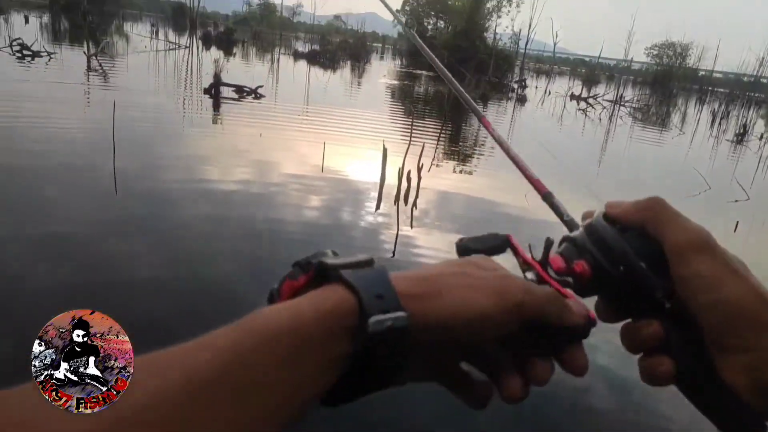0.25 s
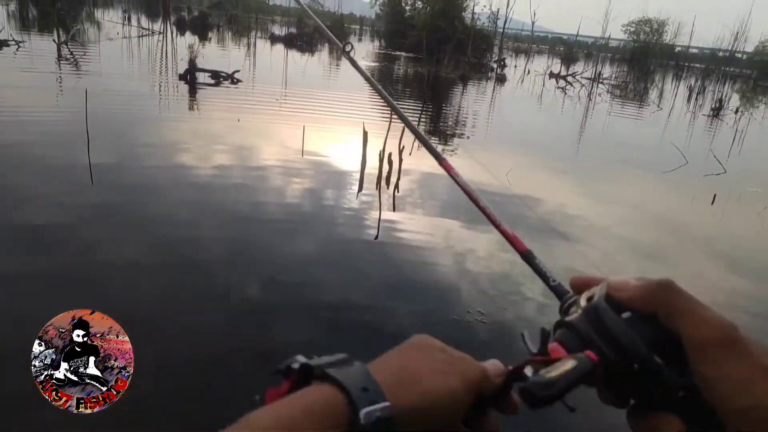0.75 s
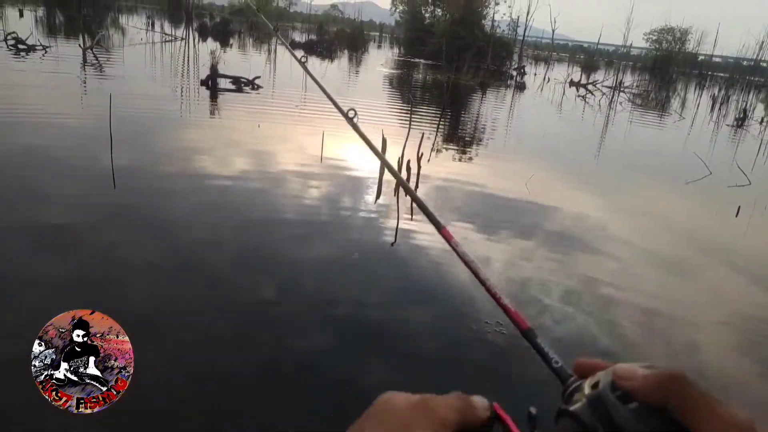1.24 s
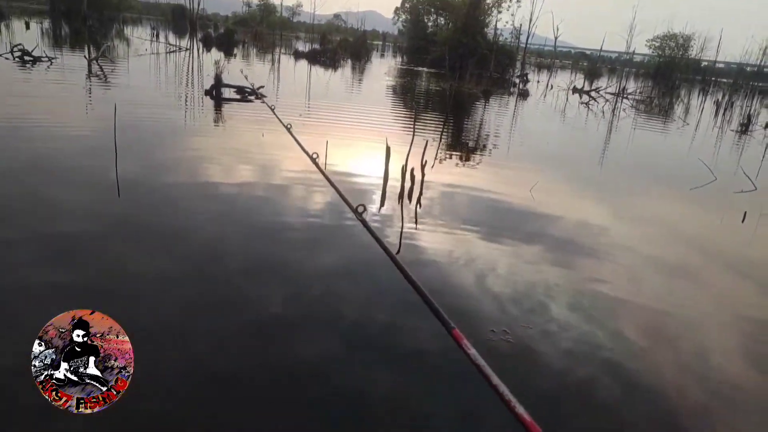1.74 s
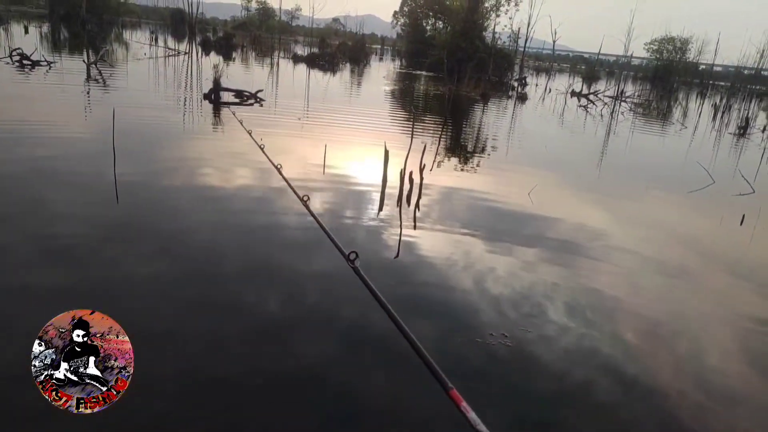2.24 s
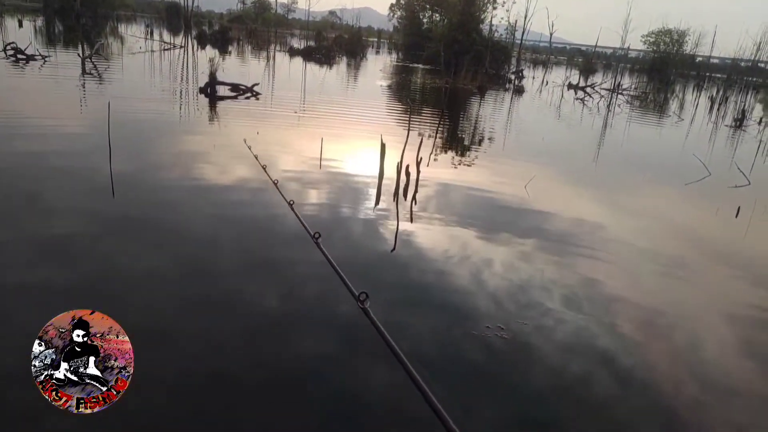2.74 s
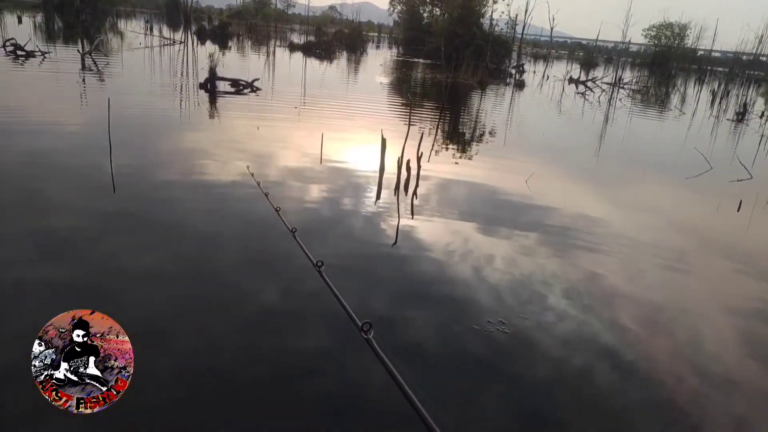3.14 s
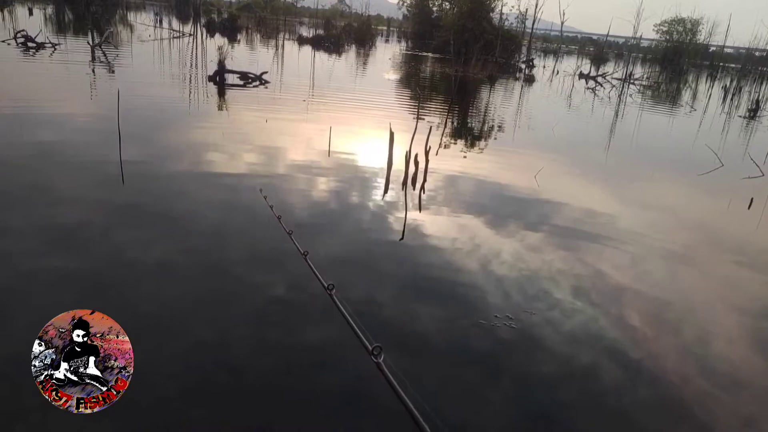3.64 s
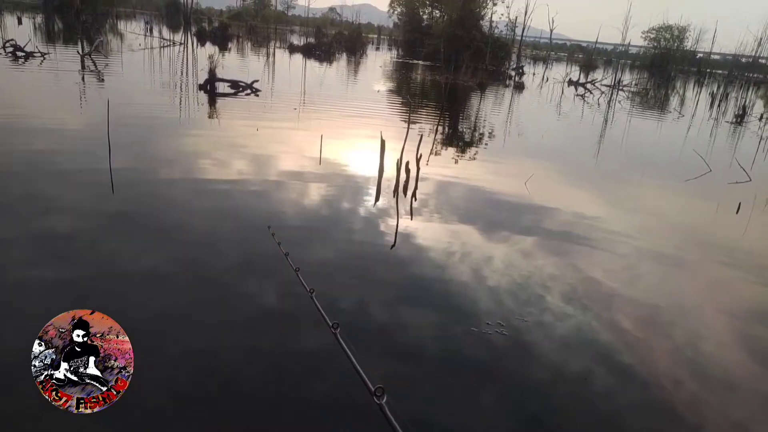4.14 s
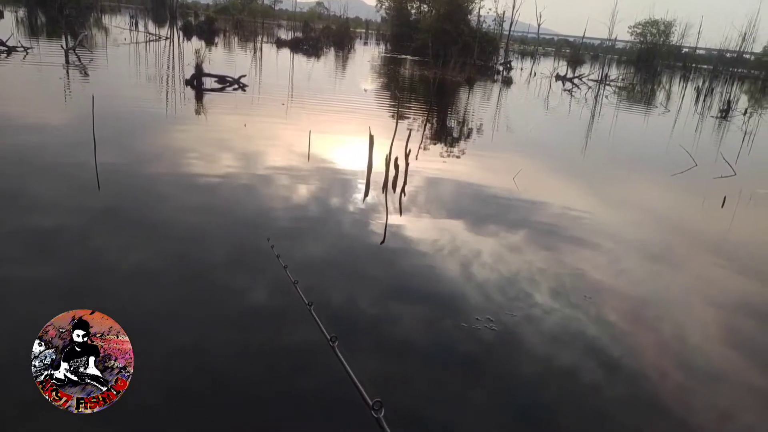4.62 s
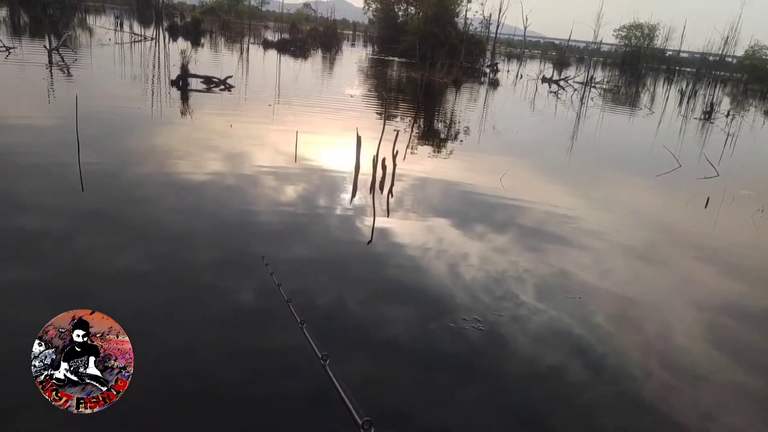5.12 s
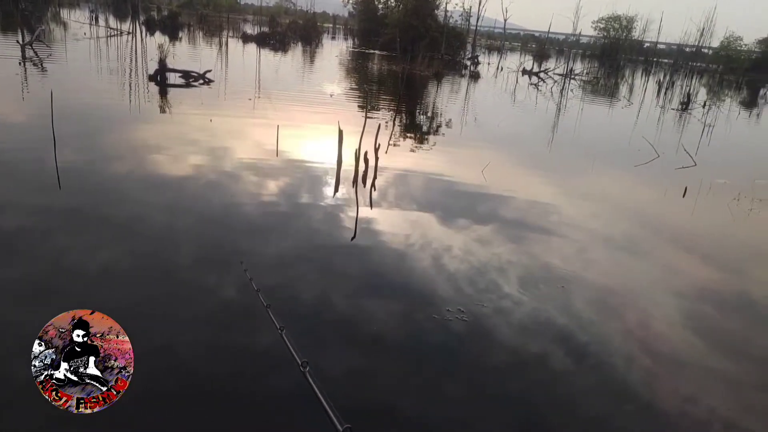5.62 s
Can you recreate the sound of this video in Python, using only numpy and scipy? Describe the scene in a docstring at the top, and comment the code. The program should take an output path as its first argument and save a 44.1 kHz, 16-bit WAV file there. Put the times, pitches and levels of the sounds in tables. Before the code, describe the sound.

A slow fishing reel whirrs and ticks close by while a small bird gives whistle-and-chirp calls over low distant traffic rumble on a swamp.

```python
"""Winding in a lure on a swamp

An angler winds slowly: gear teeth whirr as noise bursts plus harmonics, ringing ticks and noise scuffs sit
close by, and sine glides squeak. A small bird whistles, then chirps upward, and a far bird wails faintly:
gliding sines smeared by reeds. Insects trill and pip in narrow noise bands, a broad soft band joins them;
plops are short, broad resonances. Distant traffic is low noise with drones, the breeze lumpy noise and puffs
on the microphone, the hiss shimmering high noise."""
import sys
import numpy as np
from scipy import signal
from scipy.fft import rfft, irfft, next_fast_len
from scipy.io import wavfile

SR = 44100
rng = np.random.default_rng(int(sys.argv[2]) if len(sys.argv) > 2 else 0)


def pcm_store(signal):
    """Save signal as 16-bit PCM."""
    levels = np.round(np.clip(np.atleast_2d(signal), -1, 1) * 32767)
    wavfile.write(sys.argv[1], SR, levels.astype(np.int16).T)


N = 258867
T = np.arange(N) / SR
CUTOFF_HZ = 14300
LEFT_LEAD_S, BIRD_LEAD_S = .00009, .00006


def from_db(db):
    """Decibels to gain."""
    return 10 ** (np.asarray(db) / 20)


def rms_one(x):
    """Scale to unit rms."""
    return x / np.sqrt(np.mean(x ** 2) + 1e-20)


def pan(db):
    """Left and right gains for a left-right level difference."""
    return from_db(np.array([[db], [-db]]) / 2)


def drift(rate):
    """Slow chance of rms 1: 2 * rate random steps per second, joined by straight lines."""
    steps = rng.standard_normal(N // 8)
    return rms_one(np.interp(2 * rate * T, np.arange(len(steps)), steps))


def hump(s, half_s):
    """Smooth rise to 1 at time s and back; 1/e at half_s to either side."""
    return np.exp(-((T - s) / half_s) ** 2)


def swell(s, rise_s, decay_s):
    """Exponential growth to 1 at time s, then exponential decay."""
    exponent = np.minimum((T - s) / rise_s, (s - T) / decay_s)
    return np.exp(np.maximum(exponent, -30))


def white(likeness):
    """Stereo white noise; likeness is the correlation of its channels."""
    c = np.clip(likeness, -1, 1)
    mid, side = rng.standard_normal((2, N))
    return np.sqrt(1 + c) * mid + np.sqrt(1 - c) * np.array([side, -side])


def colour(x, spectrum):
    """Filter by (frequency [Hz], level [dB]) or (frequency [Hz], left [dB], right [dB]); rms 1."""
    size = next_fast_len(N)
    log_hz = np.log(np.fft.rfftfreq(size, 1 / SR) + 1)
    hz, *columns = np.transpose(spectrum)
    log_points = np.log([hz[0] / 2, *hz, hz[-1] * 2])
    gains = from_db([np.interp(log_hz, log_points, [-90, *c, -90]) for c in columns])
    return rms_one(irfft(rfft(x, size) * gains, size)[:, :N])


def resonate(x, hz, width_hz):
    """Resonance applied twice for steep skirts; width_hz is that of one pass."""
    centre = min(hz, .45 * SR)
    b, a = signal.iirpeak(centre, centre / width_hz, fs=SR)
    once = signal.lfilter(b, a, x)
    return signal.lfilter(b, a, once)


def add(out, s, sound):
    """Mix a short sound in at time s."""
    i = max(int(s * SR), 0)
    out[..., i:i + sound.shape[-1]] += sound[..., :max(N - i, 0)]


def left_first(x, lead_s=LEFT_LEAD_S):
    """Sound reaches the right port a little later than the left."""
    return np.array([x[0], np.interp(T - lead_s, T, x[-1])])


OPENING_S = .045   # part of a note, before stretching, that may be firm or soft


def notes(shape, sung, waver, flutter_db):
    """Near-pure tone: one pitch and level gesture, stretched, opened firm or soft, never quite steady."""
    s, hz, db = np.transpose(shape)
    out = np.zeros(N)
    for start, level_db, ratio, stretch, opening_db in sung:
        t = T[:int(s[-1] * stretch * SR)] / stretch
        pitch_hz = ratio * np.interp(t, s, hz) * (1 + waver * drift(173)[:len(t)])
        opening = np.interp(t, [OPENING_S / 2, OPENING_S], [opening_db, 0])
        flutter = flutter_db * drift(108.6)[:len(t)]
        loudness = from_db(level_db + np.interp(t, s, db) + opening + flutter)
        add(out, start, loudness * np.sin(2 * np.pi * np.cumsum(pitch_hz) / SR))
    return out


REEDS_T60_S = .48


def reeds(x, near_db, near_s, far_db):
    """Nearby stems smear a call at once; the banks add a faint tail, another for each ear."""
    t = T[:int(.6 * SR)]
    near, far = np.exp(-t / near_s), from_db(-60 * t / REEDS_T60_S)
    envelope = from_db(near_db) * rms_one(near) + from_db(far_db) * rms_one(far)
    echoes = envelope / np.sqrt(len(t)) * rng.standard_normal((2, len(t)))
    return left_first([x], BIRD_LEAD_S) + signal.fftconvolve(x[None], echoes, axes=1)[:, :N]


TAUT_AT_S, TIGHTEN_S, SLACK_LOAD = 2.1, 0.57, 0.12


def load():
    """Pull of the line on the reel, 0-1: grows from its slack share as the line comes taut."""
    return SLACK_LOAD + (1 - SLACK_LOAD) / (1 + np.exp((TAUT_AT_S - T) / TIGHTEN_S))


# pushes on the crank: (time [s], rise [dB], half length [s])
CRANK_PUSHES = [(1.57, 9, 0.0399), (2.162, 6, 0.0351), (2.51, 7, 0.04015), (2.661, 4, 0.039),
                (2.971, 8, 0.0397), (3.139, 4, 0.039), (3.442, 4, 0.0703), (3.592, 7, 0.0351),
                (3.847, 8, .02), (4.041, 7, .03), (4.298, 4, 0.0502), (4.44, 4, 0.0599), (4.829, 5, 0.0795),
                (5.019, 4, 0.0499), (5.22, 6, 0.0303), (5.342, 5, 0.0402), (5.459, 4, 0.0504),
                (5.818, 4, 0.0506)]
# resonance of the reel's body: (frequency [Hz], level [dB per Hz])
REEL_BODY_SPECTRUM = [(1000, -19), (1450, -11), (1750, -0.5), (2050, 1), (2300, -10.5), (2700, -12),
                      (3400, -62)]
GEARS_FULL_LOAD_DB, TEETH_PER_S = -59, 170   # level between pushes
WHINE_TO_FRICTION_DB, WHINE_FLICKER_DB = 3, 5
GEAR_BEND_PER_DB = 0.01   # share of pitch


def gears(mesh_db, uneven, effort_db):
    """Meshing teeth: friction bursts and a wavering whine in the reel's body; a push is louder, higher."""
    push_db = sum(db * hump(s, half_s) for s, db, half_s in CRANK_PUSHES) + effort_db * drift(9)
    mesh = 2 * np.pi * np.cumsum(TEETH_PER_S * (1 + uneven * drift(11))) / SR
    friction = rms_one(white(0.87) * from_db(mesh_db * np.cos(mesh)))
    whine = 0
    for harmonic in range(9, 15):
        partial = np.cos(harmonic * mesh + rng.uniform(0, 2 * np.pi))
        whine = whine + partial * from_db(WHINE_FLICKER_DB * drift(14))
    body_whine = from_db(WHINE_TO_FRICTION_DB) * colour(whine, REEL_BODY_SPECTRUM)
    whirr = rms_one(colour(friction, REEL_BODY_SPECTRUM) + body_whine)
    # bent playback time raises the pitch with the push
    bent_s = T + GEAR_BEND_PER_DB * np.cumsum(push_db - push_db.mean()) / SR
    whirr = np.array([np.interp(bent_s % T[-1], T, side) for side in whirr])
    return from_db(GEARS_FULL_LOAD_DB + push_db) * load() * left_first(whirr)


# dull road noise: (frequency [Hz], level [dB per Hz])
ROAD_SPECTRUM = [(25, 4), (60, 1), (100, -0.5), (200, -4), (320, -7.5), (500, -12.5), (700, -20.5),
                 (1000, -36.5), (1400, -54), (2500, -38)]
# engine drones: (frequency [Hz], width [Hz], level [dB], nearest at [s])
ENGINE_DRONES = [(85.05, 11.9, -48.5, 0.92), (150.65, 8.8, -55.5, 5.65), (293.8, 26, -55.5, 3.16),
                 (359.1, 10.3, -62, 3.7), (459.6, 27, -62.5, .3)]
PASS_DB, PASS_HALF_S = 3.5, 0.87
ROAD_DB, SWELL_DB, SWELL_AT_S, SWELL_HALF_S = -40.5, 1, 4.5, 0.95   # road level outside the swell


def traffic():
    """Dull road noise and resonant engine notes, each swelling as its vehicle passes; one broad swell."""
    road = from_db(ROAD_DB) * colour(white(0.87), ROAD_SPECTRUM)
    source = white(0.9)
    engines = 0
    for hz, width_hz, db, s in ENGINE_DRONES:
        level = from_db(db + PASS_DB * hump(s, PASS_HALF_S))
        engines = engines + level * rms_one(resonate(source, hz, width_hz))
    return left_first(road + engines) * from_db(SWELL_DB * hump(SWELL_AT_S, SWELL_HALF_S))


# wind noise: (frequency [Hz], level [dB per Hz])
BREEZE_SPECTRUM = [(8, 3.5), (25, -12), (47, -0.5), (70, -14), (120, -31), (300, -30.5), (900, -41.5)]
# gusts: (time [s], rise [dB], half length [s])
BREEZE_GUSTS = [(.2, 8, 0.32), (2.557, 6, 0.075), (3.628, 3, 0.088), (5.65, 4.5, 0.38)]
# puffs on the microphone: (time [s], peak level [dB], swing [Hz], left-right [dB])
AIR_PUFFS = [(0.32, -27, 51.3, -22.5), (.365, -33, 37.7, -26), (0.43, -38, 53.5, -28)]
BREEZE_DB, WAVER_DB, WAVER_RATE = -45, 1, 1.72   # level between gusts


def breeze():
    """Lumpy low noise, partly each port's own; a puff pushes and pulls the diaphragm once."""
    air = white(.45)
    gusts_db = sum(db * hump(s, half_s) for s, db, half_s in BREEZE_GUSTS)
    level = from_db(BREEZE_DB + gusts_db + WAVER_DB * drift(WAVER_RATE))
    out = level * colour(air, BREEZE_SPECTRUM) * pan(-0.38)
    for s, peak_db, hz, side_db in AIR_PUFFS:
        turn = 2 * np.pi * hz * (T - s)
        push_pull = turn * np.exp((1 - np.minimum(turn ** 2, 100)) / 2)   # peaks at 1
        out = out - from_db(peak_db) * pan(side_db) * push_pull
    return out


def shimmer(x, patchy_db, per_s, count=24):
    """Above 1 kHz each narrow band flickers on its own."""
    size = next_fast_len(N)
    spectrum = rfft(x, size)
    edges = np.geomspace(1000, CUTOFF_HZ, count)
    band_of_bin = np.digitize(np.fft.rfftfreq(size, 1 / SR), edges[:-1])
    out = 0
    for k in range(count):
        band = irfft(spectrum * (band_of_bin == k), size)[:, :N]
        flicker = from_db(patchy_db * drift(per_s)) if k else 1   # band 0 is below 1 kHz
        out = out + band * flicker
    return rms_one(out)


# hiss of air and microphone: (frequency [Hz], left [dB per Hz], right [dB per Hz])
HISS_SPECTRUM = [(574, 14, 14), (1305, 1.5, 0), (2500, 0.5, 3), (3500, 0.5, -1), (4200, -1, -0.5),
                 (6000, -1, 2.5), (8450, -0.5, -1.5), (9350, 0.5, -7), (11700, 0, -9), (14200, -1.5, -9.5)]
HISS_START_DB, HISS_DB, HISS_RISE_S = -56, -52, 1.2


def hiss(flicker_db):
    """Shimmering bed of high noise, brighter on the left; quieter at first."""
    db = np.interp(T, [0, HISS_RISE_S], [HISS_START_DB, HISS_DB])
    bed = shimmer(colour(white(0), HISS_SPECTRUM), patchy_db=2.0, per_s=18)
    return from_db(db + flicker_db * drift(16)) * bed


PULSE_WAVER, BANDS_TRIM_DB = .06, -2.5   # share of pulse rate


def noise_bands(rows, throb_db, swell_db, fade_s):
    """Resonant noise bands, each throbbing, swelling and fading by chance; a row may pulse."""
    out, source = 0, white(0.042)
    for start, end, hz, width_hz, db, side_db, per_s, depth_db in rows:
        present = np.clip(np.minimum(T - start, end - T) / fade_s + 1, 0, 1)
        pulse = 2 * np.pi * per_s * np.cumsum(1 + PULSE_WAVER * drift(3.8)) / SR
        motion_db = depth_db * np.cos(pulse) + throb_db * drift(31) + swell_db * drift(2.8)
        band = rms_one(resonate(source, hz, width_hz))
        out = out + present * from_db(db + motion_db) * pan(side_db) * band
    return from_db(BANDS_TRIM_DB) * out


# noise bands, insects and last a broad soft one: (from [s], to [s], pitch [Hz], width [Hz],
#     level before trim [dB], left-right [dB], pulse rate [1/s], pulse depth [dB])
BAND_ROWS = [(1.4, 5.87, 4510, 90, -69.5, -3, 0, 0), (2.5, 5.87, 5250, 120, -70.5, -4, 0, 0),
             (1.1, 5.87, 6970, 400, -64.5, -4, 0, 0), (0, 5.87, 8168, 70, -67, 4.5, 16.6, 3.2),
             (2.3, 5.87, 9480, 450, -69.5, 12, 0, 0), (.6, 2.6, 9950, 1000, -66.5, 16, 0, 0),
             (1.5, 2.3, 7000, 260, -68.5, 6, 0, 0), (.6, 2.2, 2650, 800, -63, 1, 0, 0)]
*INSECT_TRILLS, SOFT_BAND = BAND_ROWS


def insects(**motion):
    """Each kind shrills in a noise band of its own; one pulses with its wing strokes."""
    return noise_bands(INSECT_TRILLS, **motion)


# hand and line on the reel: (peak time [s], level [dB], rise [s], decay [s], left-right [dB])
REEL_SCUFFS = [(.06, -49, 0.096, 0.087, 3.5), (0.431, -52.5, 0.027, 0.22, 0.5),
               (0.552, -38.5, 0.0018, 0.0064, -9), (1.165, -41.5, 0.0025, 0.011, -13.5),
               (1.368, -48, 0.0048, 0.043, -4.5), (2.74, -59, 0.11, 0.11, 0), (3.1, -62, 0.14, 0.087, -9),
               (3.6, -59.5, 0.054, 0.033, -16), (4.59, -57, 0.012, 0.083, -13)]
# scuffing friction: (frequency [Hz], left [dB per Hz], right [dB per Hz])
SCUFF_SPECTRUM = [(990, -6, -17), (3500, -4, -17), (4680, -10, -6), (6000, -7, 1.5), (7850, -15, -2.5),
                  (9400, -3, -10.5), (14300, -4.5, -22)]


def scuffs(grain_db):
    """Hand and line scuff the reel: short swells of grainy friction noise."""
    friction = colour(white(0.063) * from_db(grain_db * drift(900)), SCUFF_SPECTRUM)
    envelope = 0
    for s, db, rise_s, decay_s, side_db in REEL_SCUFFS:
        envelope = envelope + from_db(db) * pan(side_db) * swell(s, rise_s, decay_s)
    return friction * envelope


FAINT_TICKS_PER_S, FAINT_TICK_DB, FAINT_TICK_SIDE_DB = 1.9, -47, 4   # rate at full load
FAINT_TICK_HZ, FAINT_TICK_OCTAVES = 3820, (-1.48, 1.184)
FAINT_TICK_WIDTH, FAINT_TICK_RATTLE = 0.53, 0.061   # share of pitch; 0-1


def faint_ticks():
    """Chance contacts, more frequent under load, as rows like those of REEL_TICKS."""
    times = T[rng.random(N) < FAINT_TICKS_PER_S * load() / SR]
    pitches_hz = FAINT_TICK_HZ * 2 ** rng.uniform(*FAINT_TICK_OCTAVES, len(times))
    return [(s, FAINT_TICK_DB, hz, FAINT_TICK_WIDTH * hz, FAINT_TICK_RATTLE, FAINT_TICK_SIDE_DB)
            for s, hz in zip(times, pitches_hz)]


# clearest ticks and knocks of the reel: (time [s], peak before pan [dB], ring [Hz], width [Hz],
#                                         rattle [0-1], left-right [dB])
REEL_TICKS = [(0.071, -37, 5100, 3000, 0.12, 2), (1.085, -39.5, 3120, 1590, 0.08, 4),
              (1.37, -38, 11000, 6000, 0, 9), (1.4605, -36, 3080, 2000, 0.04, 0),
              (1.522, -38.5, 3000, 2370, 0.1, 2), (1.96, -42, 3200, 1500, 0.1, 0),
              (2.321, -39.5, 2750, 1100, 0.03, 0), (2.742, -40, 11900, 6500, .08, 13),
              (2.872, -42, 3200, 3600, .05, 0), (2.9095, -36.5, 3500, 2300, 0.08, 2),
              (3.008, -40, 12000, 6500, 0.1, 15), (3.02, -40, 12000, 6500, .08, 14),
              (3.117, -48, 2940, 700, 0.08, -1), (3.3763, -42, 3200, 2800, 0.02, 2),
              (3.849, -39.5, 3220, 3000, 0.08, 2), (3.9637, -35.5, 3040, 700, 0.05, -1),
              (4.4978, -44, 2500, 1100, 0.07, 0), (4.271, -40, 9040, 5000, .08, 10),
              (4.7344, -29, 3500, 2500, 0.07, 2), (4.996, -28, 7200, 7000, 0.05, 2),
              (5.42, -36, 3000, 1600, 0.12, 0), (5.426, -36, 5500, 4500, 0.17, 0),
              (5.728, -39, 4100, 1300, 0.05, 0), (5.8319, -30, 3150, 800, 0.015, 1),
              (3.9646, -45, 1050, 600, .03, 3), (4.203, -41, 845, 600, 0.04, 1),
              (4.812, -40, 1090, 700, 0.08, 2), (5.506, -40.5, 1500, 800, 0.09, 7),
              (5.706, -38, 1430, 600, 0.1, 5)]


def ticks(rattle_s):
    """Each contact is a snap and a brief noise rattle into a damped part of the reel."""
    out, t = np.zeros((2, N)), T[:1024]
    for s, peak_db, hz, width_hz, rattle, side_db in REEL_TICKS + faint_ticks():
        force = rattle * rng.standard_normal((2, len(t))) * np.exp(-t / rattle_s)
        force[:, 0] += 1   # snap
        tick = resonate(force, hz, min(width_hz, SR / 4))
        add(out, s, tick / np.abs(tick).max() * from_db(peak_db) * pan(side_db))
    return out


# arched wail: (time after start [s], pitch [Hz], relative level [dB])
WAIL_SHAPE = [(0, 842, -4.5), (.025, 910, -2), (.04, 963, -8.5), (.055, 1160, -21), (.11, 1120, -14),
              (.17, 1070, -16), (.22, 890, -5.5), (.255, 880, -43)]
# wails sung: (time [s], level before trim and reeds [dB], pitch ratio, length ratio, opening [dB])
WAILS_SUNG = [(.225, -62, 1, 0.95, -2), (1.184, -60.5, 1.0, 0.98, 1), (2.438, -57.5, 1.005, 1, -4)]
WAIL_TRIM_DB = -2.0


def far_bird():
    """Faint gliding wail from across the water on the left."""
    wail = notes(WAIL_SHAPE, WAILS_SUNG, waver=.005, flutter_db=2.5)
    return from_db(WAIL_TRIM_DB) * reeds(wail, near_db=6.0, near_s=0.015, far_db=-11) * pan(13.6)


# arched whistle: (time after start [s], pitch [Hz], relative level [dB])
WHISTLE_SHAPE = [(0, 4600, -18), (.015, 4900, -5), (.03, 5200, -3), (.045, 5370, -1), (.06, 5420, -1),
                 (.078, 5390, -2), (.092, 5280, -10), (.105, 5150, -28)]
# whistles sung: (time [s], level before reeds [dB], pitch ratio, length ratio, opening [dB])
WHISTLES_SUNG = [(.383, -52, 1.0, 1.05, -9), (1.217, -47, 1.003, 1.0, 1), (2.165, -50, 1.003, 1.0, 2),
                 (3.558, -48, .985, .9, -1), (4.586, -54.5, 1.03, 1.5, 7), (5.643, -48.5, .975, .95, -11)]
# rising chirp: (time after start [s], pitch [Hz], relative level [dB])
CHIRP_SHAPE = [(0, 2950, -22), (.014, 3170, -19), (.04, 3550, -27), (.052, 3720, -15), (.065, 3900, -8),
               (.08, 4130, -6), (.092, 4380, -3), (.102, 4600, 0), (.109, 4830, 1), (.115, 5250, 1),
               (.121, 5500, -4), (.127, 5650, -26)]
# chirps sung: (time [s], level before reeds [dB], pitch ratio, length ratio, opening [dB])
CHIRPS_SUNG = [(.521, -43, 1.015, 1.0, -9), (1.357, -45, 1.0, 1.0, -2), (2.308, -45, 1.005, .985, 0),
               (3.692, -45, .995, 1.02, 1), (4.741, -44.5, .995, 1.0, 1), (5.782, -44, 1.0, 1.02, -5)]


def bird():
    """Two-note call from the reeds: gliding tones, an arched whistle then a rising chirp."""
    whistles = notes(WHISTLE_SHAPE, WHISTLES_SUNG, waver=.007, flutter_db=2.5)
    chirps = notes(CHIRP_SHAPE, CHIRPS_SUNG, waver=.009, flutter_db=2.8)
    return reeds(whistles + chirps, near_db=-8.5, near_s=.03, far_db=-6) * pan(-3)


def soft_band(**motion):
    """Broad soft noise band near 2.7 kHz (last of BAND_ROWS)."""
    return noise_bands([SOFT_BAND], **motion)


def bursts(rows, rise_s):
    """Short bursts of broadly resonant noise that die away."""
    out = np.zeros((2, N))
    for s, db, hz, decay_s, side_db in rows:
        burst = rms_one(resonate(white(0.17), hz, hz))
        out += from_db(db) * pan(side_db) * swell(s, rise_s, decay_s) * burst
    return out


# short bursts, plops in the water and last a dull scuff of the reel:
#     (peak time [s], level [dB], pitch [Hz], decay [s], left-right [dB])
BURST_ROWS = [(0.812, -55.5, 735, 0.021, -10), (1.0, -61, 660, 0.031, -5), (4.475, -48, 1040, 0.024, 3),
              (5.8, -47.5, 1800, 0.016, 1)]
*WATER_PLOPS, DULL_SCUFF = BURST_ROWS


def plops(rise_s):
    """Small plops in the water: each a short burble of resonant noise."""
    return bursts(WATER_PLOPS, rise_s)


# an insect's high pips: (time [s], level [dB])
INSECT_PIPS = [(2.32, -66), (2.572, -60), (2.624, -58), (2.675, -63), (2.715, -57), (2.76, -64), (3.0, -60),
               (3.102, -58), (3.14, -65)]
PIP_HZ, PIP_WIDTH_HZ, PIP_SIDE_DB = 12540, 170, 14


def pips(rise_s, decay_s):
    """An insect gives a few uneven, very high pips: swells of one narrow noise band."""
    tone = rms_one(resonate(white(.5), PIP_HZ, PIP_WIDTH_HZ))
    envelope = sum(from_db(db) * swell(s, rise_s, decay_s) for s, db in INSECT_PIPS)
    return pan(PIP_SIDE_DB) * tone * envelope


# faint rising squeak of the crank: (time after start [s], pitch [Hz], relative level [dB])
SQUEAK_SHAPE = [(0, 1750, -12), (.02, 1950, -5), (.048, 2070, 0), (.06, 2090, -20)]
# squeaks heard: (time [s], level [dB], pitch ratio, length ratio, opening [dB])
SQUEAKS_HEARD = [(3.615, -51, 1.005, .9, -15), (4.215, -53, .985, .9, -12), (5.075, -52, .99, .85, -15),
                 (5.722, -51, 1.0, 1.05, 0)]


def squeaks():
    """Now and then the crank's bearing sings for a moment: a rising tone."""
    return left_first([notes(SQUEAK_SHAPE, SQUEAKS_HEARD, waver=.005, flutter_db=2.0)])


def dull_scuff(rise_s):
    """Short dull scuff of the reel near 1.8 kHz: resonant noise (last of BURST_ROWS)."""
    return bursts([DULL_SCUFF], rise_s)


def scene():
    """The swamp, with the reel in front of it."""
    birds = bird() + far_bird()
    water = plops(rise_s=0.0051)
    motion = dict(throb_db=2.0, swell_db=1.1, fade_s=0.12)
    trills = insects(**motion) + pips(rise_s=.008, decay_s=.009)
    air = traffic() + breeze() + hiss(flicker_db=1.0) + soft_band(**motion)
    whirr = gears(mesh_db=6.0, uneven=.035, effort_db=1.0)
    rubbing = squeaks() + scuffs(grain_db=2.5) + dull_scuff(rise_s=0.0051)
    return birds + water + trills + air + whirr + rubbing + ticks(rattle_s=0.0093)


def record(dry):
    """Steep elliptic low-pass cuts the top."""
    low_pass = signal.ellip(12, .1, 80, CUTOFF_HZ, fs=SR, output="sos")
    return signal.sosfilt(low_pass, dry)


dry = scene()
out = record(dry)
pcm_store(out)
```